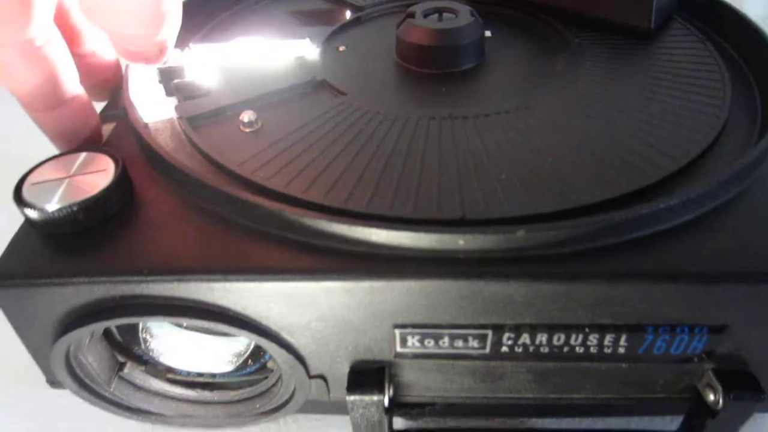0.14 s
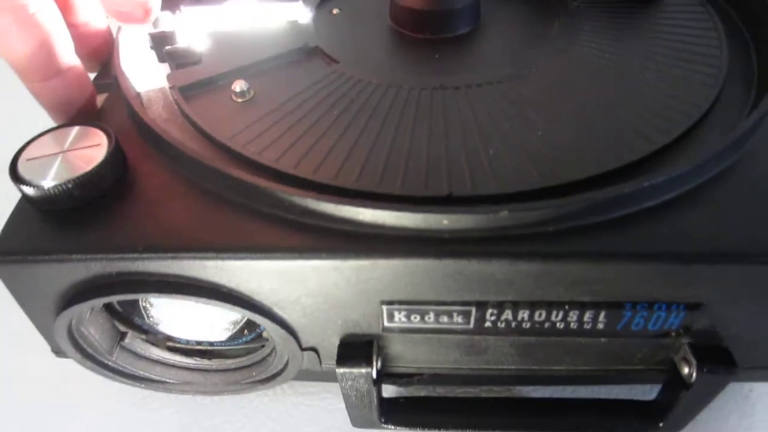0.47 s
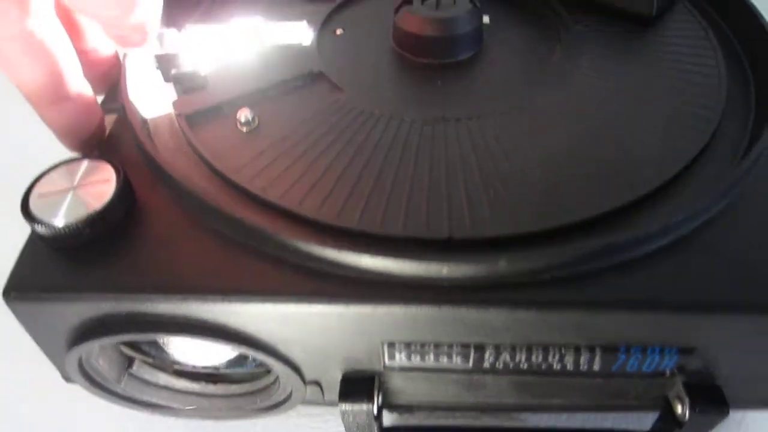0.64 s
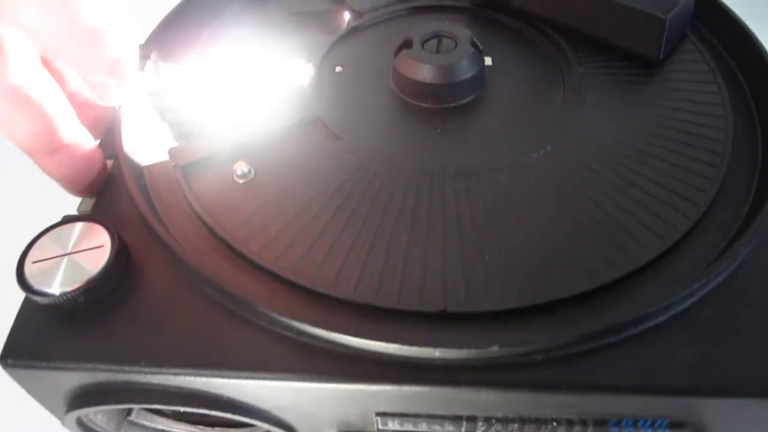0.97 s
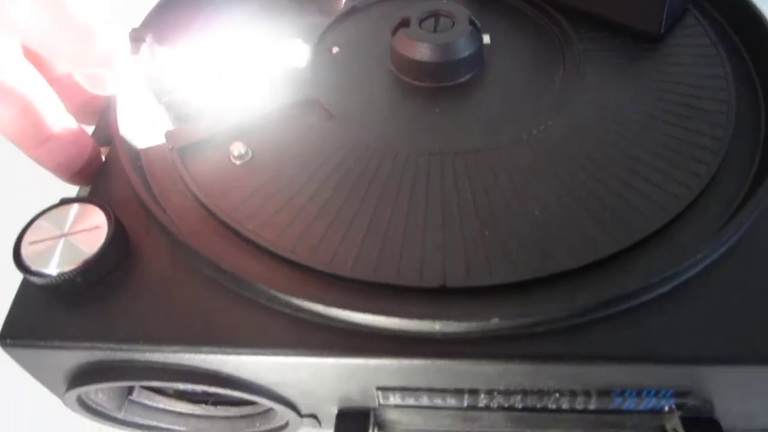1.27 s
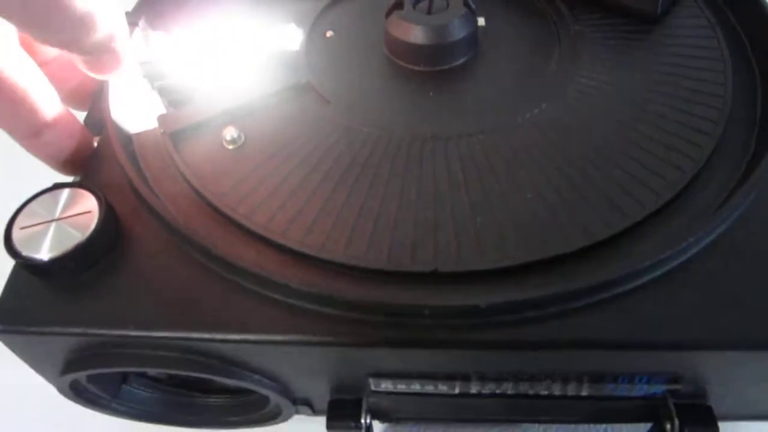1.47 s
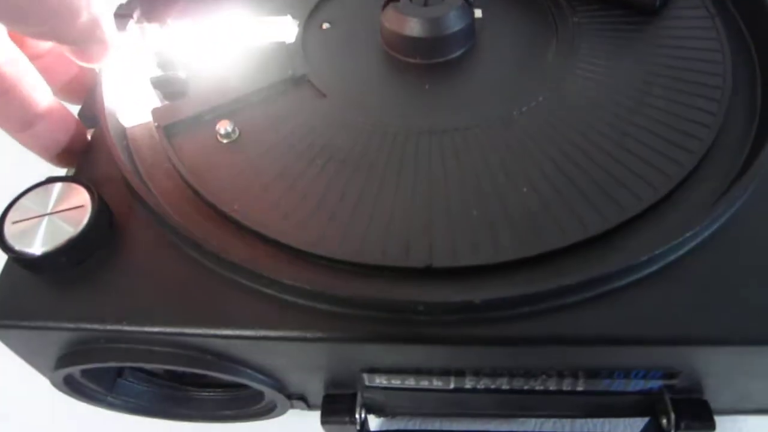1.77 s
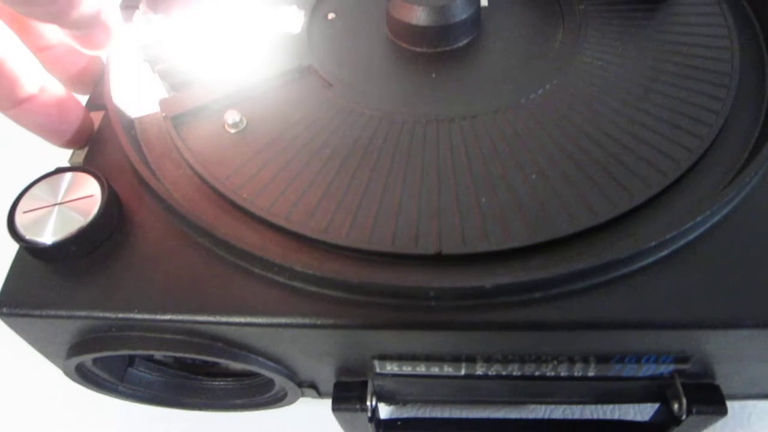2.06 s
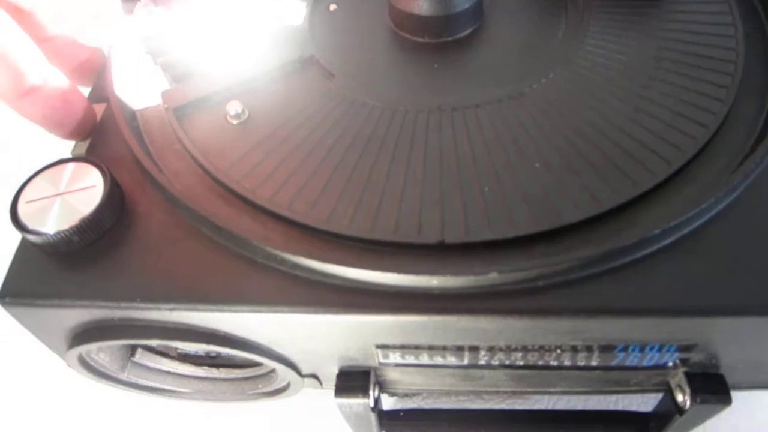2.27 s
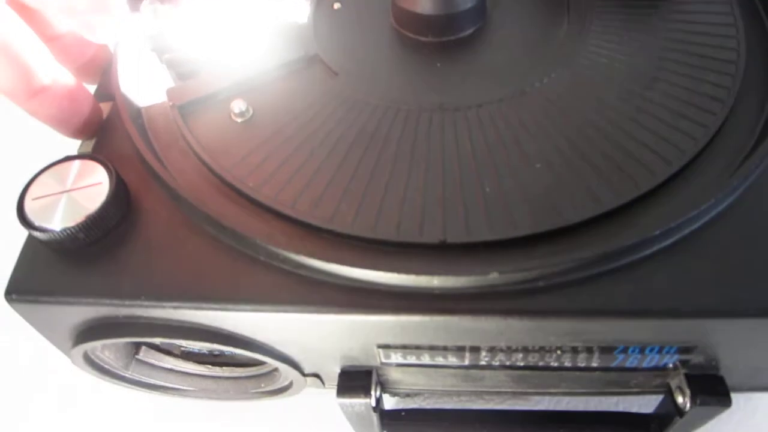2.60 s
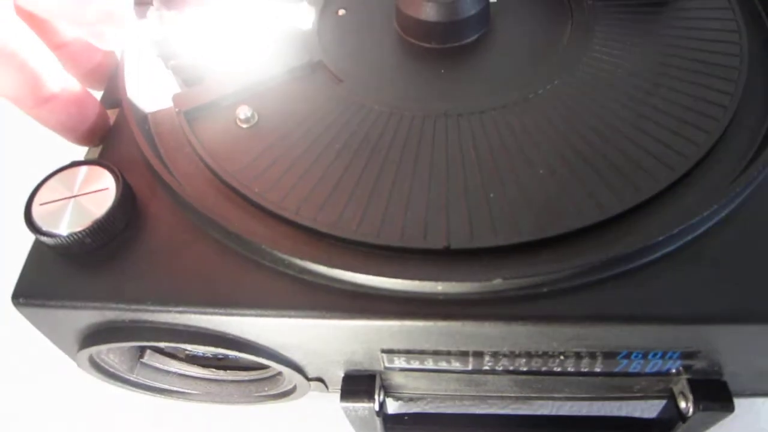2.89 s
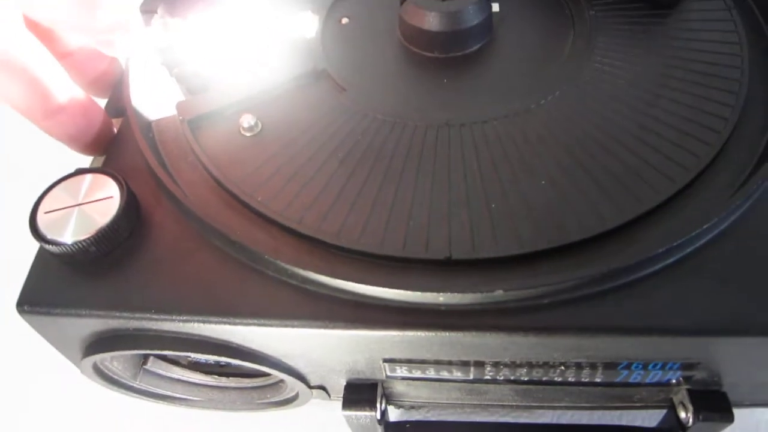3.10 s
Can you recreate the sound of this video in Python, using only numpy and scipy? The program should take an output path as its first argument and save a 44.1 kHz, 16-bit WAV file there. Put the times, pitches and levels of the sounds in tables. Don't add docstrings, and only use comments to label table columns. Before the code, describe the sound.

Slide projector with a steady airy fan, unsteady low hum and rapid light ticks; a heavy metallic slam comes halfway, a sharper double clack follows, heard close up indoors, slightly left.

```python
import sys
import numpy as np
from scipy import signal
from scipy.fft import rfft, irfft, next_fast_len
from scipy.io import wavfile
from scipy.ndimage import uniform_filter1d

SR = 44100
rng = np.random.default_rng(int(sys.argv[2]) if len(sys.argv) > 2 else 0)


def dump(signal):
    limited = np.clip(np.atleast_2d(signal).T, -1, 1)
    pcm = np.round(limited * 32767).astype(np.int16)
    wavfile.write(sys.argv[1], SR, pcm)


def invert_db(x):
    u = np.asarray(x, float) / 20
    return 10 ** u


N = 142884


def unit(x):
    return x / np.sqrt(np.mean(x ** 2) + 1e-20)


def along(points, hz):
    f, v = np.transpose(points)
    return np.interp(np.log(hz + 1), np.log(f + 1), v)


def filtered(x, response):
    m = next_fast_len(N + SR // 2)
    return irfft(rfft(x, m) * response(np.fft.rfftfreq(m, 1 / SR)), m)[..., :N]


def peak(f, hz, width_hz):
    return 1j * f * width_hz / (hz * hz - f * f + 1j * f * width_hz)


# (frequency [Hz], level scatter [dB])
NOISE_GRAIN = [(1500, 1), (5000, 1), (9000, 5), (15000, -1)]


def speckled(x):
    hz, _, z = signal.stft(x, SR, nperseg=2048)
    grain_db = along(NOISE_GRAIN, hz)[:, None] * rng.standard_normal(z.shape[1:])
    return signal.istft(z * invert_db(grain_db), nperseg=2048)[1][:, :N]


def microphone_hiss():
    colour = [(3000, -34), (12000, -23.5), (13500, -1.5), (15500, 3.0)]  # (frequency [Hz], level [dB])
    hiss = filtered(rng.standard_normal((2, N)), lambda hz: invert_db(along(colour, hz)))
    return invert_db(-77.5) * speckled(hiss)


# (frequency [Hz], left-right correlation [0..1])
STEREO_LIKENESS = [(60, 0.078), (130, 0.4), (290, 0.89), (640, 1), (1410, 0.73), (3100, 0.51), (6800, 0.4),
                   (12000, 0.27)]


def spread(response, patchy_db):
    z = signal.stft(rng.standard_normal((2, N)), nperseg=512)[2]
    field = uniform_filter1d(rng.standard_normal(z.shape[1:]), size=5, axis=0)
    field = uniform_filter1d(field, size=8, axis=1)
    pair = signal.istft(z * invert_db(patchy_db * unit(field)), nperseg=512)[1][:, :N]

    def mid_and_side(hz):
        turn = np.arccos(np.clip(along(STEREO_LIKENESS, hz), 0, 1)) / 2
        return response(hz) * np.array([np.cos(turn), np.sin(turn)])

    mid, side = filtered(pair, mid_and_side)
    return unit(np.array([mid + side, mid - side]))


# (frequency [Hz], density [dB per Hz])
CASING_ROAR = [(15, -51), (25, -17), (176, -7.5), (232, -6), (310, -4), (493, 0), (694, -4.5), (838, -2),
               (1500, -17), (1950, -54), (3300, -120)]
# (frequency [Hz], level [dB])
GRILLE_AIR = [(900, -22.5), (1500, -12), (2000, -13), (3000, -23.5), (4100, -31), (7600, -37.5),
              (10000, -48), (12200, -61.5)]
# (frequency [Hz], width [Hz], rms level [dB])
HUM_TONES = [(108.2, 14, -57), (242, 3.36, -52.5), (293.7, 6, -54), (358.6, 30.6, -51), (419.7, 4.6, -51.5),
             (483.3, 6.5, -49), (651, 13, -63), (657, 28, -57), (837.3, 15, -52.5), (1084, 5, -59.5),
             (1175, 21, -55.5), (1358, 42, -59), (1982, 24, -66.5), (7050, 170, -80)]


def fan():
    roar = invert_db(-38.5) * spread(lambda hz: invert_db(along(CASING_ROAR, hz)), patchy_db=0.8)
    air = invert_db(-51) * speckled(spread(lambda hz: invert_db(along(GRILLE_AIR, hz)), patchy_db=2.0))
    tones = 0
    for hz, width_hz, db in HUM_TONES:
        tones = tones + invert_db(db) * spread(lambda f: peak(f, hz, width_hz) ** 2, patchy_db=0.5)
    rotor_hz = 42.5
    phase = [[0], [.6]]
    rotor = invert_db(-59.5) * np.sin(2 * np.pi * rotor_hz * np.arange(N) / SR + phase)
    return roar + air + tones + rotor


# (frequency [Hz], t60 [s])
ROOM_DECAY = [(300, 0.068), (3000, 0.16), (10000, 0.079)]


def room(x):
    hz, t, z = signal.stft(rng.standard_normal((2, SR // 2)), SR, nperseg=256)
    tail = signal.istft(z * invert_db(-60 * t / along(ROOM_DECAY, hz)[:, None]), SR, nperseg=256)[1]
    late = np.pad(x, (100, 0))[None]
    return signal.fftconvolve(late, tail / np.linalg.norm(tail[0]), axes=1)[:, :N]


# (time [s], level [dB], treble [dB])
BELT_TICKS = [(0.0071, -30, 0), (0.081, -30, -1), (0.1586, -33, 1), (0.2393, -32, -1), (0.3174, -30, -1),
              (0.392, -30, -3), (0.4639, -31, -2), (0.5379, -32, -4), (0.6192, -33, -3), (0.6977, -30, -2),
              (0.7735, -31, -1), (0.848, -34, 1), (0.922, -34, -1), (0.9978, -37, -1), (1.0758, -33, -2),
              (1.1517, -31, 0), (1.2275, -34, 1), (1.3014, -34, 0), (1.3754, -34, 1), (1.5319, -31, -2),
              (1.6079, -32, 0), (1.6837, -34, 0), (1.7584, -35, 0), (1.8338, -35, 0), (1.9103, -35, -1),
              (1.9875, -31, -2), (2.0628, -32, 2), (2.2121, -33, 4), (2.287, -35, 2), (2.3661, -34, 1),
              (2.4435, -32, 0), (2.5188, -33, 3), (2.5955, -34, 3), (2.6699, -35, 1), (2.7458, -37, 0),
              (2.8234, -34, 1), (2.8993, -30, -2), (2.9745, -32, 1), (3.0497, -36, 1), (3.1228, -36, 0),
              (3.1984, -35, -2)]
# (delay [s], level [dB])
JOINT_REBOUNDS = [
    (.001, 0),
    (.0032, -6.5),
    (.0052, -15),
    (.0088, -17),
    (.0112, -17),
    (.0135, -21),
]
# (frequency [Hz], width [Hz], level [dB])
PLATE_MODES = [(1990, 760, -4.5), (2626, 474, 1.5), (3097, 218, 3), (3606, 540, -12.5), (4580, 800, -24.5),
               (5420, 640, -17.5), (6480, 830, -22), (7370, 690, -24), (8940, 440, -24.5),
               (10940, 830, -33)]


def belt():
    bright_scatter_db, rebound_dull_db = .8, .8
    grit_s, grit_level = .0011, .22
    modes = len(PLATE_MODES)
    luck = rng.standard_normal((len(BELT_TICKS), modes, len(JOINT_REBOUNDS) + 1))
    t = np.arange(SR // 200) / SR
    treble = (np.transpose(PLATE_MODES)[0] > 4000)[:, None]
    grit = grit_level * rng.standard_normal((len(BELT_TICKS), len(t))) * np.exp(-t / grit_s)
    blows = np.zeros((modes, N + SR))
    for (s, db, treble_db), chance, scrape in zip(BELT_TICKS, luck, grit):
        blow = np.where(treble, invert_db(treble_db) * (scrape + (t == t[9])), t == 0)
        for k, (delay, loss_db) in enumerate(JOINT_REBOUNDS):
            at = round((s + delay * (1 + .012 * k * chance[0, -1])) * SR)
            dull_db = (k > 0) * rebound_dull_db * np.arange(modes)
            scatter_db = (1.5 + k) * bright_scatter_db * chance[:, k]
            level_db = 23.5 + db + loss_db + scatter_db - dull_db
            blows[:, at:at + len(t)] += invert_db(level_db)[:, None] * blow

    def plate(f):
        return np.array([(-1) ** k * invert_db(db) * peak(f, hz, width_hz)
                         for k, (hz, width_hz, db) in enumerate(PLATE_MODES)])

    return filtered(blows[:, :N], plate).sum(0)


# (time [s], frequency [Hz], level [dB], t60 [s])
RINGING_PARTS = [
    (1.476, 1960, -37, .2),
    (2.172, 1190, -32, .15),
    (2.172, 2000, -36, .1),
    (2.198, 4190, -58, .95),
    (2.168, 5620, -57, .3),
    (2.168, 4800, -58, .22),
    (2.168, 6300, -57, .25),
]
# (time [s], length [s], frequency [Hz], level [dB])
LEVER_SQUEAKS = [
    (1.318, 0.012, 1550, -33),
    (1.839, 0.013, 1590, -35.5),
    (1.423, .006, 640, -32),
    (1.4265, .008, 640, -24),
    (1.578, .006, 640, -28),
    (1.586, .004, 600, -27),
]


def squeaks_and_rings():
    t, out = np.arange(N) / SR, 0
    for s, hz, db, t60 in RINGING_PARTS:
        after = np.maximum(t - s, 0)
        swell = 1 - np.exp(-after / 0.0061)
        out = out + invert_db(db - 60 * after / t60) * swell * np.sin(2 * np.pi * hz * t)
    for s, length, hz, db in LEVER_SQUEAKS:
        swell = np.sin(np.pi * np.clip((t - s) / length, 0, 1))
        out = out + invert_db(db) * swell * np.sin(2 * np.pi * hz * t)
    return out


# (frequency [Hz], level [dB], t60 [s])
CASING_MODES = [(408, -12, 0.033), (477, -5.5, 0.029), (565, 4, 0.055), (658, 6, 0.044), (807, 3.5, 0.025),
                (964, 4.5, 0.018), (1085, -1.5, 0.03), (1228, 8, 0.023), (1385, 0, 0.036),
                (1786, -2, 0.038), (1970, 0.5, 0.032), (2067, -8, 0.035), (2560, -9, 0.034),
                (2920, -6, 0.027)]


def contacts(events, colour, thin_hz):
    thud, crack, t = np.zeros(N + SR), np.zeros(N + SR), np.arange(SR // 8) / SR
    for s, thud_db, crack_db, rattle, dull_hz in events:
        grit = rng.standard_normal((2, len(t))) * invert_db(2 * rng.standard_normal((2, len(t))))
        shape = np.exp(-t / rattle * 1.34) * (1 - np.exp(-t / 0.00088))
        ring = 0
        for hz, db, t60 in CASING_MODES:
            decay = invert_db(db + 1.9 * rng.normal() - 60 * t / t60)
            softness = 1 + (hz / dull_hz) ** 4
            thinness = 1 + (thin_hz / hz) ** 4
            ring = ring + decay / softness / thinness * np.sin(2 * np.pi * hz * t)
        ring = ring * (1 - np.exp(-t / 0.00011))
        push = grit[0] * shape
        blow = (t == 0) * 0.0047 / rattle
        knock = signal.fftconvolve(push / np.linalg.norm(push) + blow, ring)
        at = round(s * SR)
        thud[at:][:len(knock)] += invert_db(thud_db + 8.0) * knock / abs(knock).max()
        crack[at:][:len(t)] += invert_db(crack_db + 7) * grit[1] * (shape + 0.1 * invert_db(-60 * t / 0.03))
    return thud[:N] + filtered(crack[:N], lambda hz: invert_db(along(colour, hz)))


# (time [s], thud [dB], crack [dB], rattle [s], thud dulls above [Hz])
CAM_CONTACTS = [(1.3215, -36, -53, 0.0068, 2500), (1.449, -28.5, -48, 0.0066, 2500),
                (1.4635, -26, -39, 0.0034, 1510), (1.4657, -17.5, -24, 0.002, 1610),
                (1.4686, -13, -40.5, 0.0032, 1450), (1.4722, -18, -27, 0.0016, 1420),
                (1.4745, -22, -32, 0.0017, 1800), (1.479, -31, -46, 0.002, 2010),
                (1.487, -36, -66, 0.12, 2170), (1.5733, -29, -61, 0.0018, 2200),
                (1.595, -37, -68, 0.009, 900), (2.0815, -24, -41.5, 0.0027, 1510),
                (2.1672, -21, -34, 0.0024, 1200), (2.1715, -28, -47, 0.002, 2200),
                (2.1755, -26, -47, 0.0037, 2200), (2.179, -28.5, -49, 0.0052, 2000),
                (2.190, -28.5, -48, 0.0026, 900), (2.198, -31, -54, 0.0057, 653)]
# (time [s], thud [dB], crack [dB], rattle [s], thud dulls above [Hz])
STEEL_CATCHES = [(1.393, -62, -56, 0.0038, 1500), (1.397, -54, -60, 0.043, 1500),
                 (1.4285, -51, -41, 0.0017, 900), (1.432, -64, -60, .012, 900),
                 (1.4775, -28, -55, 0.0019, 2510), (1.482, -32.5, -52, .0015, 2490),
                 (1.459, -67, -52, .003, 900), (1.5733, -38.5, -40, 0.0026, 2500),
                 (1.576, -34, -46, .002, 2500), (1.618, -65, -56, 0.0032, 900),
                 (2.073, -33, -55, 0.0022, 900), (2.1675, -54, -31.5, 0.0037, 900),
                 (2.17, -63, -60.5, 0.087, 900), (2.1392, -26, -25.5, 0.0048, 3020),
                 (2.142, -37, -32.5, .004, 3000), (2.147, -34.5, -40, 0.006, 1590)]
# (frequency [Hz], level [dB])
CRACK_COLOUR = [(800, -22), (2400, 6), (3100, 12), (4000, 6), (6000, -2.5), (8800, -7), (12000, -12),
                (15500, -7)]
# (frequency [Hz], level [dB])
SNAP_COLOUR = [(800, -30), (2000, -13), (3800, -5.5), (5800, -0.5), (8800, -4), (12000, -5), (15500, -5)]


def changer():
    cams = contacts(CAM_CONTACTS, CRACK_COLOUR, thin_hz=405)
    catches = contacts(STEEL_CATCHES, SNAP_COLOUR, thin_hz=1200)
    return cams + catches + squeaks_and_rings()


# (frequency [Hz], level [dB])
MIC_COLOUR = [(150, -41.5), (350, -8), (480, 1.5), (8000, 3.5), (10000, -4.5), (12000, -18.5), (13000, -19),
              (15500, -13)]
# (frequency [Hz], left over right [dB])
LEFT_LEAN = [(60, 0), (180, 1), (550, -2.5), (1650, 1), (4970, 5), (15000, 1)]
# (frequency [Hz], left leads by [rad])
LEFT_LEAD = [(200, 0.29), (1800, 0.084), (3400, -0.72), (6000, -0.062), (9000, -0.87)]


def scene():
    ticks, blows = belt(), changer()
    to_room = invert_db(-9.5) * ticks + invert_db(-8.5) * blows
    works, wet = filtered(np.array([ticks + blows, to_room]), lambda hz: invert_db(along(MIC_COLOUR, hz)))

    def lean(hz):
        half = invert_db(along(LEFT_LEAN, hz) / 2) * np.exp(.5j * along(LEFT_LEAD, hz))
        return np.array([half, 1 / half])

    return filtered(works + fan() + room(wet), lean)


def top_cut(x):
    return signal.sosfilt(signal.butter(12, 16320, fs=SR, output="sos"), x)


def record(dry):
    top_hz = 15860
    mix = filtered(dry + microphone_hiss(), lambda hz: 1 / (1 + (hz / top_hz) ** 400))
    return top_cut(mix)


dry = scene()
out = record(dry)
dump(out)
```